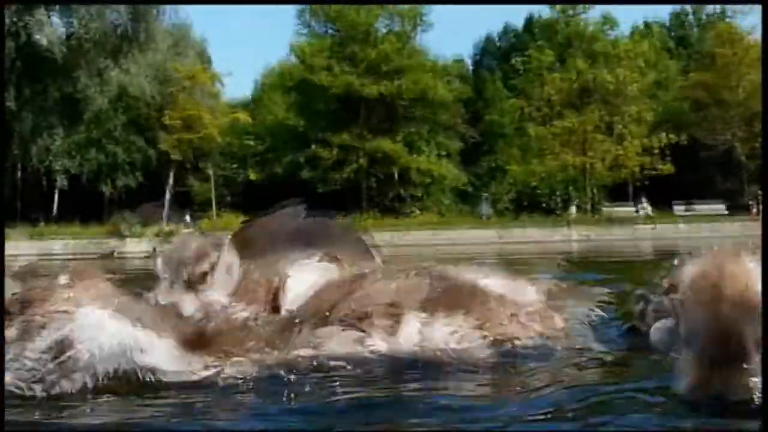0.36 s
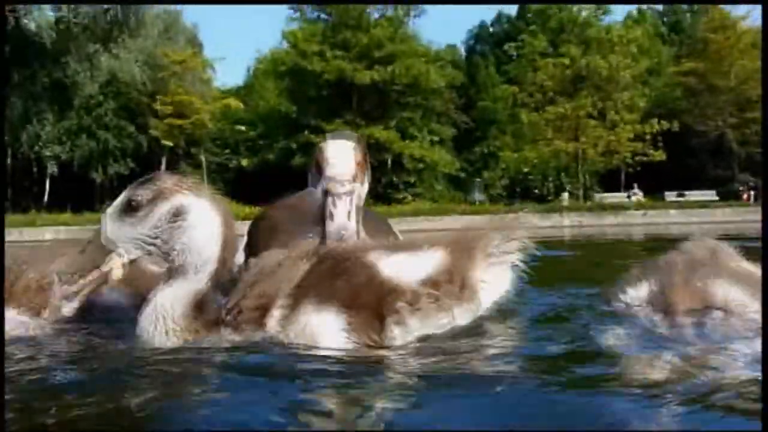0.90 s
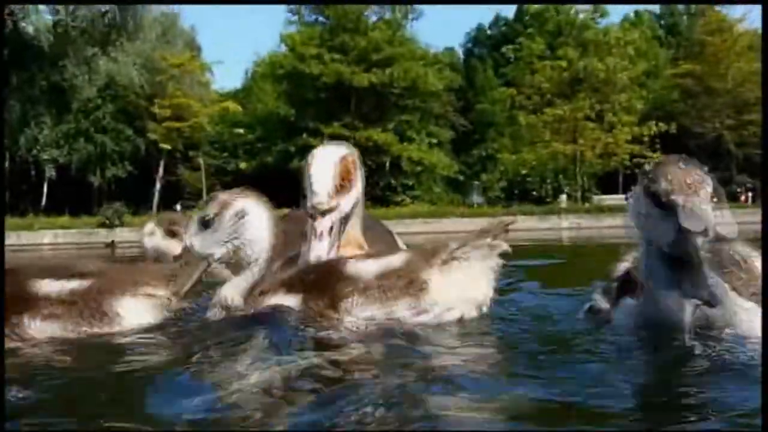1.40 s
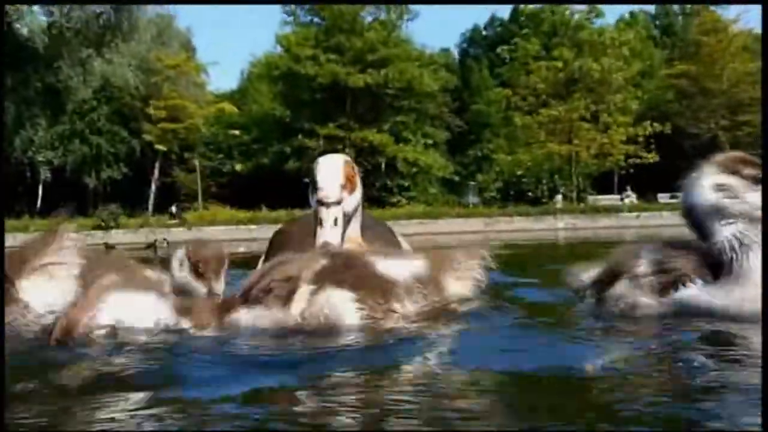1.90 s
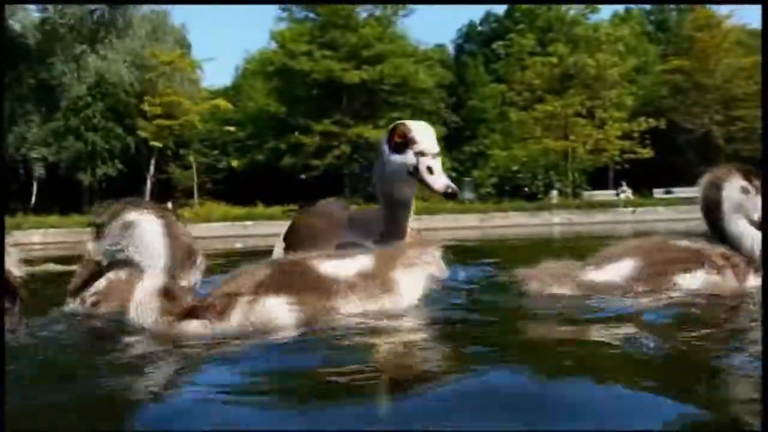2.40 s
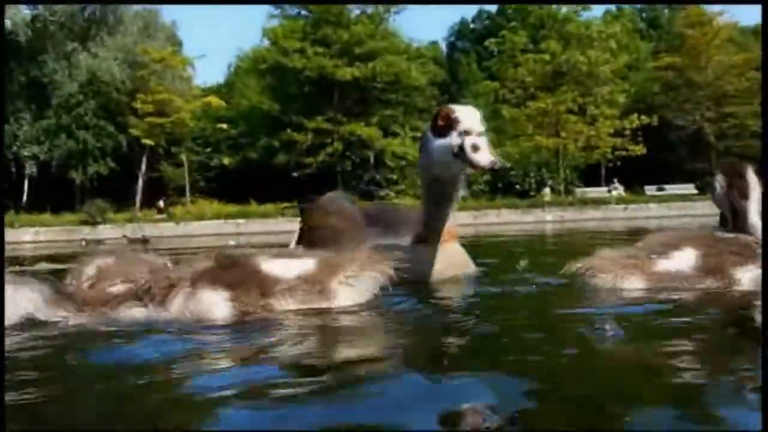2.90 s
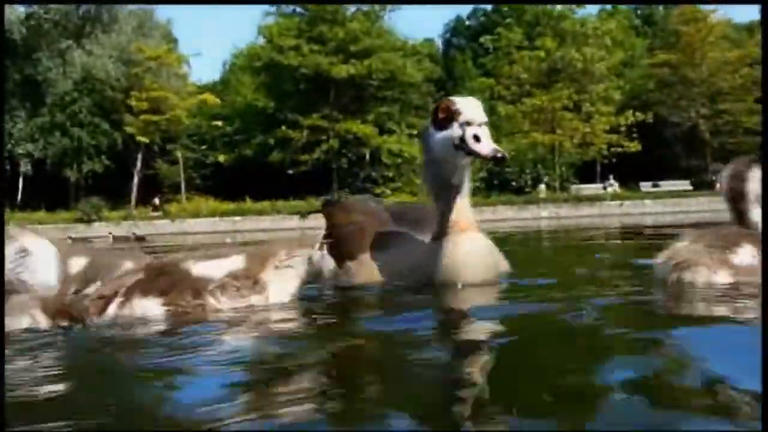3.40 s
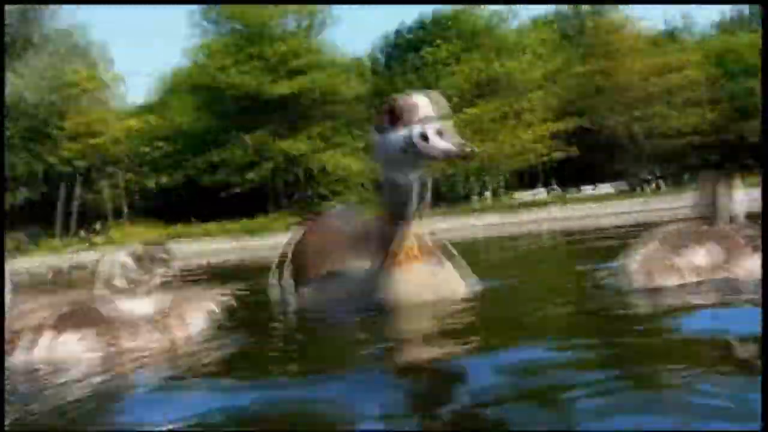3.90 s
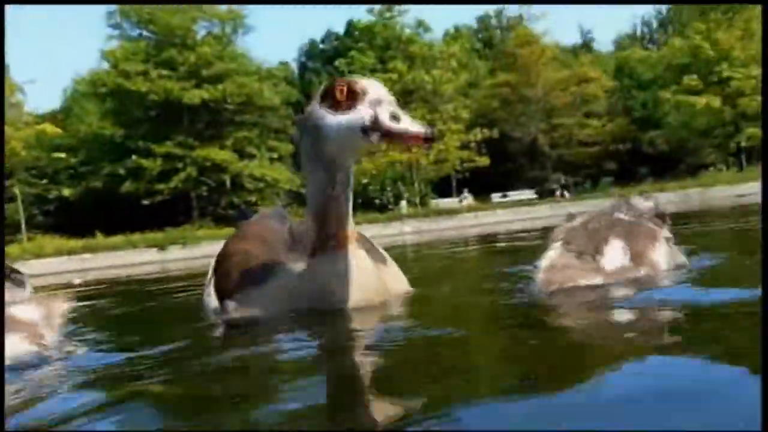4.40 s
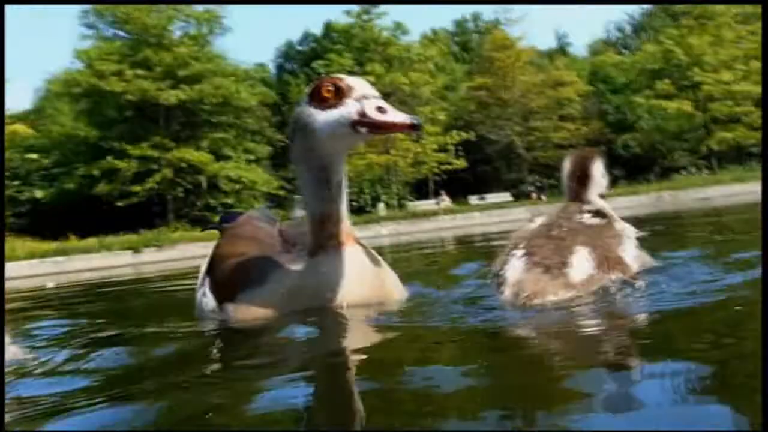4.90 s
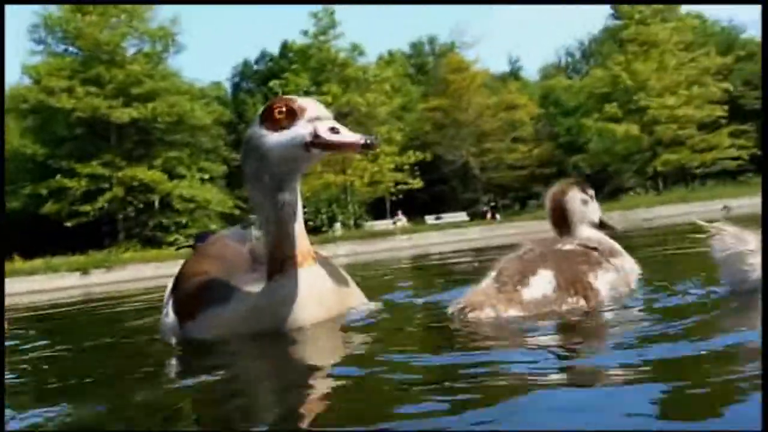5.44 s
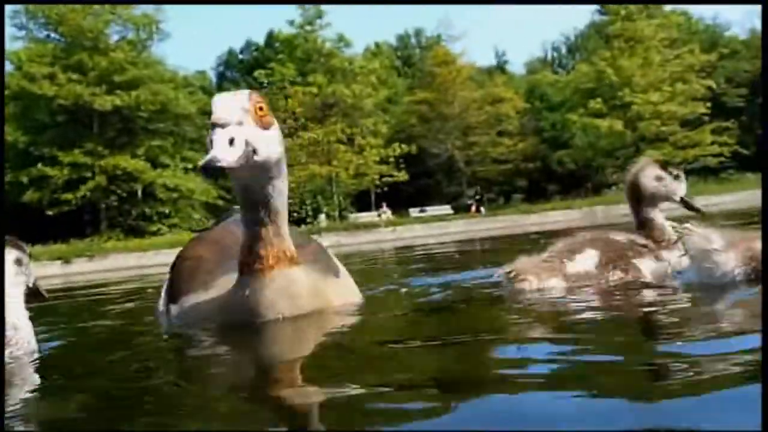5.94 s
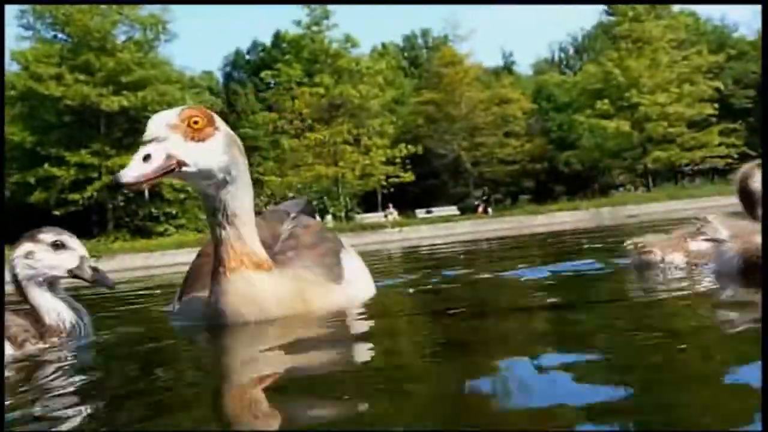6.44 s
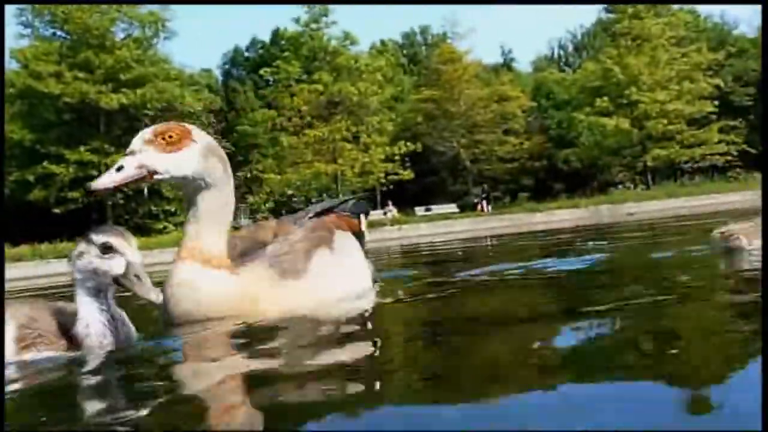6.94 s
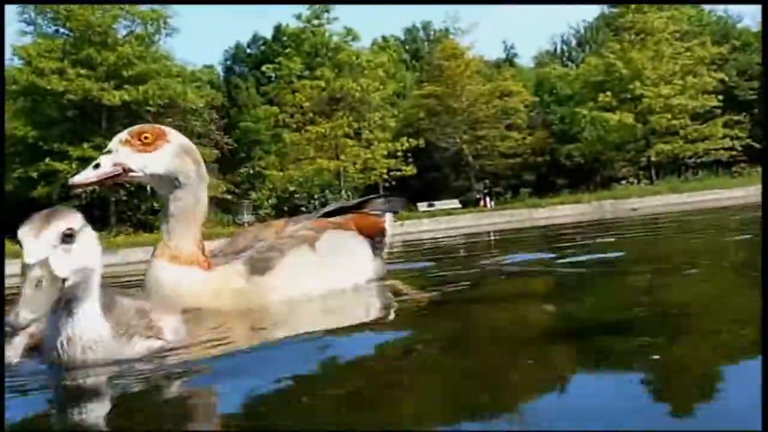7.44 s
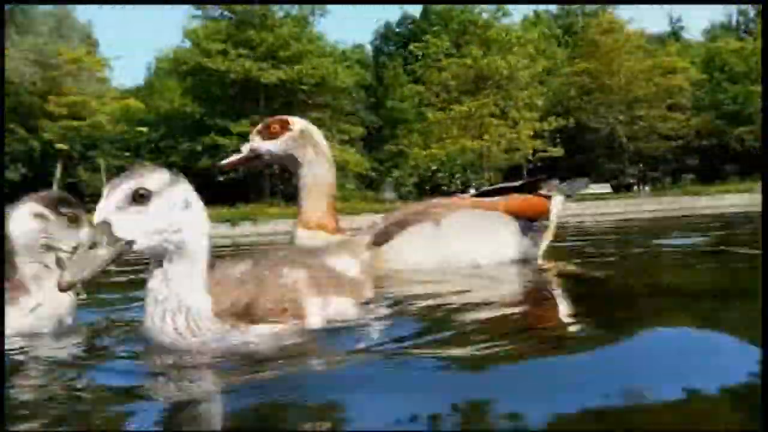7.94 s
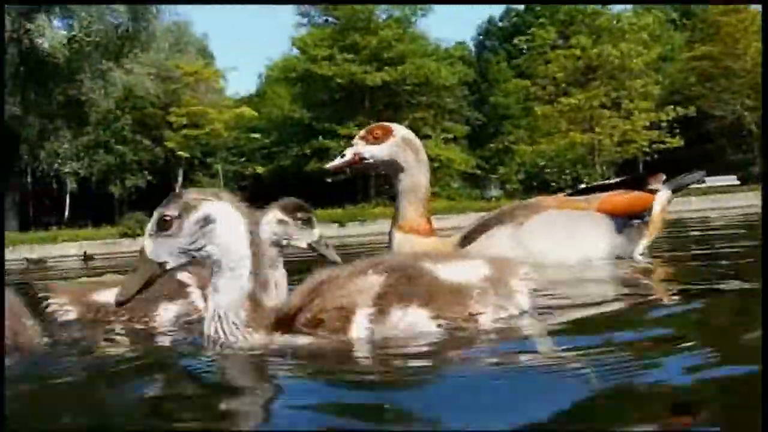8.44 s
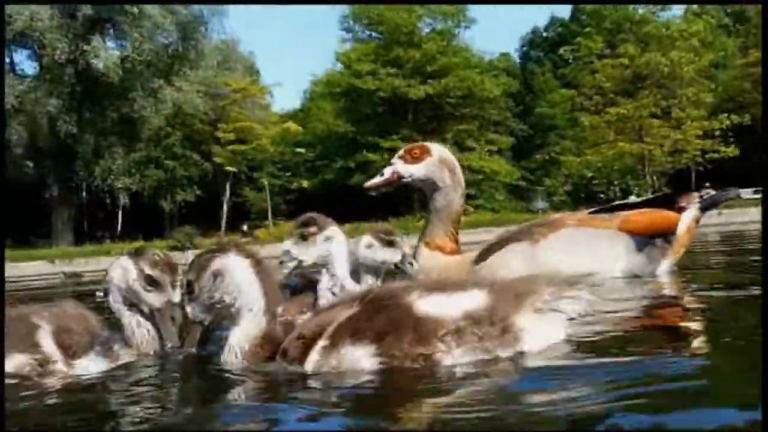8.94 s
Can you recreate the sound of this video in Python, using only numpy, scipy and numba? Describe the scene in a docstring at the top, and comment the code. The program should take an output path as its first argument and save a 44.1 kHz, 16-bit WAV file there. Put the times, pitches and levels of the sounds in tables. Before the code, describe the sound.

Goslings peep and whistle at the waterline of a park lake while their parent gives short breathy hisses; drips, knocks and farther screams surround them.

```python
"""Drips and dabbling beaks come first, close to a small microphone at the water line of a park lake.
Birds scream roughly further off (fluttering tones and noise); knocks ring the microphone's housing.
Goslings peep and whistle (near sines with moving pitch), and their parent gives short hoarse hisses,
mostly in pairs (chopped breath noise through throat resonances). Far traffic rumbles below, in noise bands;
a faint noise flickers at 8 to 10 kHz, over a thin steady whine."""
import sys
import numpy as np
from scipy import signal
from scipy.io import wavfile
from numba import njit

SR = 44100
rng = np.random.default_rng(int(sys.argv[2]) if len(sys.argv) > 2 else 0)


def dump_mix(stems):
    """Bounce the given channels to the path in sys.argv[1] as a 16-bit WAV at rate SR."""
    frames = np.atleast_2d(stems).T  # one column per channel
    limited = np.clip(frames, -1, 1)  # hard clip at full scale
    pcm = np.round(limited * 32767).astype(np.int16)
    wavfile.write(sys.argv[1], SR, pcm)


def field_ratio(decibels):
    """Amplitude ratio for a level in dB (20 dB per decade); scalars and array-likes work."""
    return 10 ** (np.asarray(decibels, dtype=float) / 20)


N = 400428


def rms_one(x):
    """Scale to rms 1."""
    return x / np.sqrt(np.mean(x ** 2) + 1e-20)


def band(x, low_hz, high_hz, order=2):
    """Butterworth band-pass."""
    return signal.sosfilt(signal.butter(order, [low_hz, high_hz], "band", fs=SR, output="sos"), x)


def drift(rate_hz, size):
    """Random wandering slower than about rate_hz, rms 1: noise through two equal one-pole low-passes."""
    r = np.exp(-2 * np.pi * rate_hz / SR)
    settling = 4000
    noise = rng.standard_normal(size + settling)
    return rms_one(signal.lfilter([1], [1, -2 * r, r * r], noise)[settling:])


def per_sample(rows):
    """First sample of a call, and its columns after the time drawn out sample by sample."""
    s, *columns = np.transpose(rows)
    start = round(s[0] * SR)
    t = np.arange(start, min(round(s[-1] * SR), N)) / SR
    return start, [np.interp(t, s, column) for column in columns]


def add(out, at, sound, fade_s):
    """Mix a sound in from sample at, with straight fades at both ends."""
    k = np.arange(len(sound))
    fade = np.clip(np.minimum(k, k[::-1]) / (fade_s * SR), 0, 1)
    out[at:at + len(sound)] += (sound * fade)[:N - at]


@njit
def resonate(x, hz, r, sr):
    """Two-pole resonance whose centre moves, gain 1 on top."""
    y = np.zeros(len(x))
    for i in range(2, len(x)):
        drive = (1 - r * r) / 2 * (x[i] - x[i - 2])
        y[i] = drive + 2 * r * np.cos(2 * np.pi * hz[i] / sr) * y[i - 1] - r * r * y[i - 2]
    return y


def peak(x, hz, width_hz):
    """The resonance applied twice, so that the valleys stay dark; width_hz is that of one pass."""
    hz = hz * np.ones(len(x))
    r = np.exp(-np.pi * width_hz / SR)
    return resonate(resonate(x, hz, r, SR), hz, r, SR)


# tone colour of the park: (frequency [Hz], relative density [dB per Hz])
PARK_COLOUR = [(15, -33), (25, -1), (144, 2.5), (423, -4.5), (501, -3), (636, -8), (1100, -12), (1830, -19),
               (2750, -19.5), (4130, -26.5), (6830, -27.5), (7700, -26.5), (10000, -62.5), (16900, -120)]
# the park's level between 60 and 600 Hz: (time [s], level [dB])
PARK_LEVEL = [(0.0, -55), (0.86, -51), (1.34, -55.5), (2.63, -55), (2.93, -55.5), (3.82, -55),
              (4.05, -54.5), (4.86, -56), (5.41, -56), (6.02, -59), (6.32, -55), (8.67, -55.5),
              (9.08, -53.5)]


def park():
    """Far rumble in third-octave noise bands, each wandering a little in level."""
    t = np.arange(N) / SR
    edges_hz = 22 * 2 ** (np.arange(27) / 3)
    white = rng.standard_normal((2, N))
    patches = [drift(3.2, N) for _ in range(4)]
    hz, db = np.transpose(PARK_COLOUR)
    rumble = 0
    for k, (low_hz, high_hz) in enumerate(zip(edges_hz, edges_hz[1:])):
        # the last two rows of the colour play no part
        level_db = np.interp(np.log(low_hz * high_hz) / 2, np.log(hz[:-2]), db[:-2])
        rumble = rumble + field_ratio(level_db + 1.69 * patches[k % 4]) * band(white[k % 2], low_hz, high_hz)
    steep_top = signal.cheby2(12, 30, 8050, fs=SR, output="sos")   # the bands end steeply at 8 kHz
    rumble = signal.sosfilt(steep_top, band(rumble, 43, 12000))
    rumble = rumble / np.std(band(rumble, 60, 600))
    return field_ratio(np.interp(t, *np.transpose(PARK_LEVEL))) * rumble


# level of the faint noise at 8 to 10 kHz, before its flicker: (time [s], level [dB])
TOP_NOISE_LEVEL = [(0, -81), (1.5, -85), (2.4, -83), (2.7, -73.5), (3.05, -71.5), (3.1, -82.5), (4.0, -84),
                   (4.5, -78), (5.0, -86.5), (5.55, -78), (6.13, -72), (6.4, -82.5), (6.7, -75),
                   (6.8, -86.5), (8.6, -83.5), (8.8, -76), (9.08, -72.5)]
# where this noise is left out: (start [s], end [s])
TOP_NOISE_GAP = (5.71, 6.125)


def top_noise():
    """A band of noise at 8 to 10 kHz whose level flickers at random; it is left out for a moment."""
    t = np.arange(N) / SR
    flicker = field_ratio(2.2 * drift(40, N))
    noise = rms_one(band(rng.standard_normal(N), 7750, 10250, order=8)) * flicker
    present = (t < TOP_NOISE_GAP[0]) | (t > TOP_NOISE_GAP[1])
    return field_ratio(np.interp(t, *np.transpose(TOP_NOISE_LEVEL))) * noise * present


def whine():
    """A thin steady tone of the electronics, its phase wandering slightly."""
    t = np.arange(N) / SR
    return field_ratio(-83.5) * np.sin(2 * np.pi * 6640 * t + 1.3 * drift(10, N))


# echoes off the banks: (delay [s], level [dB])
BANK_ECHOES = [(.04, -34), (.17, -37), (.24, -41.5), (0.361, -50.5)]


def shore(x):
    """A few dull echoes off the banks, each smeared by the trees."""
    size = round(.05 * SR)
    smear = rng.standard_normal(size) * np.hanning(size)
    dull = signal.fftconvolve(band(x, 400, 2500), smear / np.linalg.norm(smear))[:N]
    out = np.zeros(N)
    for delay_s, db in BANK_ECHOES:
        delay = round(delay_s * SR)
        out[delay:] += field_ratio(db) * dull[:N - delay]
    return out


# soft low grunts: (time [s], length [s], pitch [Hz], level [dB])
GRUNT_CALLS = [(0.551, 0.083, 560, -57), (0.664, 0.043, 560, -48), (3.786, 0.026, 555, -57.5),
               (3.951, 0.069, 550, -54.5), (4.071, 0.034, 506, -47.5), (4.086, 0.15, 960, -59),
               (7.606, 0.42, 1105, -67.5), (8.25, 0.23, 1107, -65.5)]


def grunts():
    """Soft grunts: breath noise through one narrow resonance."""
    out = np.zeros(N)
    for s, length_s, hz, level_db in GRUNT_CALLS:
        breath = rng.standard_normal(round(length_s * SR))
        add(out, round(s * SR), field_ratio(level_db) * rms_one(peak(breath, hz, 82)), .004)
    return out


# rough screams further off, one curve each: (time [s], pitch [Hz], level of the lowest tone [dB])
SCREAM_CURVES = [
    [(.07, 990, -51), (.1, 1114, -53.5), (.17, 1168, -58)],
    [(.38, 1450, -53), (.45, 1560, -56.5), (.6, 1690, -62)],
    [(.95, 1450, -56), (1.05, 1572, -55.5), (1.15, 1580, -53)],
    [(2.655, 1602, -64), (2.78, 1560, -62), (2.9, 1536, -57), (3.05, 1347, -58), (3.08, 1260, -65)],
    [(3.69, 1500, -68), (3.84, 1582, -57), (3.96, 1570, -59.5)],
    [(5.45, 1400, -82), (5.6, 1860, -72), (5.71, 1805, -61)],
    [(6.125, 1594, -51), (6.22, 1500, -58), (6.3, 1500, -59.5), (6.41, 1494, -56), (6.5, 1374, -56.5),
     (6.57, 1306, -60)],
    [(8.78, 1610, -72.5), (8.84, 1548, -58.5), (8.94, 1493, -53), (9.0, 1500, -54), (9.16, 1244, -55)],
]
# for each scream: (second harmonic [dB], third harmonic [dB], rasp [dB], swell of these, start to end [dB])
SCREAM_COLOURS = [(-77, -84, -67, -12), (-76, -91, -64.5, -18), (-77, -92, -85, 7), (-59.5, -79, -58, 2),
                  (-81, -83, -72.5, 5), (-73, -82, -69, 5), (-59, -79, -58, -3), (-66, -70, -59, 5)]


def screams():
    """Fluttering harmonics, half tone and half noise, smeared more higher up; breath rasps in the beak."""
    rasp_hz, rasp_width_hz = 2150, 950   # the beak's broad resonance; a second rides on the second harmonic
    release_s = .025   # harmonics above the lowest, and the rasp, die away first
    out = np.zeros(N)
    for rows, (second_db, third_db, rasp_db, swell_db) in zip(SCREAM_CURVES, SCREAM_COLOURS):
        at, (hz, level_db) = per_sample(rows)
        size = len(hz)
        before_end_s = (at + np.arange(size)) / SR - rows[-1][0]
        upper_db = swell_db * np.linspace(-.5, .5, size) - 14 * np.exp(before_end_s / release_s)
        hz = hz * (1 + .018 * drift(50, size))
        phase = 2 * np.pi * np.cumsum(hz * (1 + 0.0304 * drift(285, size))) / SR
        breath = rng.standard_normal(size) * field_ratio(1.0 * drift(50, size))
        rasp = peak(breath, 2 * hz, rasp_width_hz) + peak(breath, rasp_hz, rasp_width_hz)
        voice = field_ratio(rasp_db + upper_db) * rms_one(band(rasp, 1400, 4160, order=3))
        for k, db in enumerate([level_db, second_db + upper_db, third_db + upper_db], 1):
            tone = field_ratio(2.6 * drift(60, size)) * np.sin(k * phase)
            noise = rms_one(peak(breath, k * hz, 260 * k))
            voice = voice + field_ratio(db) * (tone + .62 * noise)
        add(out, at, voice, .008)
    return out


# knocks on the housing, before the band-pass: (time [s], level [dB], gain of modes above 1 kHz [dB])
BUMP_HITS = [(0.744, -31.5, -4), (0.77, -24, -14), (0.852, -21.5, 11), (0.87, -30, -3), (0.893, -24, 4),
             (0.916, -30, 4.5), (0.928, -32, -2)]
# the housing's modes: (frequency [Hz], level [dB], time to fall 60 dB [s])
HOUSING_MODES = [(308, -7.5, 0.052), (446, 0.5, 0.015), (1500, -1.5, 0.0065), (3000, -15, 0.013),
                 (5460, -24, 0.0023)]


def bumps():
    """Something bumps the housing and sets its modes ringing; each knock has its own amount of crack."""
    out = np.zeros(N)
    t = np.arange(round(.08 * SR)) / SR
    for s, level_db, crack_db in BUMP_HITS:
        ring = sum(field_ratio(db + crack_db * (hz > 1000) - 60 * t / t60_s) * np.sin(2 * np.pi * hz * t)
                   for hz, db, t60_s in HOUSING_MODES)
        add(out, round(s * SR), -field_ratio(level_db) * ring, .0002)
    return band(out, 230, 8000, order=3)


# drips and dabbles near the microphone, before the band-pass:
# (time [s], bubble level [dB], bubble pitch at its start [Hz], tick strength [dB])
DRIP_HITS = [(.0285, -36.5, 2020, -7), (.099, -36.5, 880, 1.5), (.1344, -44, 1070, 2.5),
             (.1938, -40.5, 1410, 1.5), (.2885, -41.5, 829, 3.5), (.353, -35.5, 1640, -8),
             (.394, -29, 1100, 1), (.4257, -30.5, 1500, -7), (.534, -33.5, 1710, -7.5),
             (.5554, -41, 1670, -3), (.6, -38.5, 1420, -9), (.6759, -40.5, 1380, -12),
             (.719, -36, 1660, -7), (.7252, -30, 1000, 3.5), (1.3465, -28.5, 1850, -13),
             (1.4485, -30.5, 1500, -10), (1.462, -32.5, 1320, -4), (1.6924, -39, 1640, -4),
             (1.7398, -40, 1700, -10), (1.8578, -40.5, 840, 3), (1.8994, -43, 1140, 1),
             (2.038, -45, 1040, -6), (2.126, -40, 1930, -4), (2.164, -31.5, 1730, -5),
             (2.1744, -37.5, 1350, 2), (2.2144, -43, 1070, 2), (2.4342, -31, 1200, -7.5),
             (2.6254, -43, 1790, 0), (2.8524, -31.5, 1030, 0.5), (2.9108, -36.5, 1530, 1),
             (2.9344, -31.5, 1180, -3), (3.2603, -36.5, 3040, -11), (3.6885, -41, 1410, -5),
             (3.877, -48, 1540, 5.5), (5.362, -42, 1200, -1), (5.5455, -37, 1200, 1.5),
             (5.8985, -32.5, 1160, -18), (6.335, -38, 1033, -11), (6.4183, -34.5, 756, 0.5),
             (6.583, -38, 1230, -5), (7.3544, -41, 2260, -8), (7.388, -45, 1210, 6.5),
             (8.0017, -46, 2720, -6), (8.923, -45, 1540, -7)]


def water():
    """A drip is a noise tick and a bubble ringing upward; fainter ones come at random, thickest early on."""
    out = np.zeros(N)
    t = np.arange(round(.04 * SR)) / SR
    faint = [(s ** 2.5 * N / SR, -58 + 9 * a, 700 * 4.5 ** b, -3) for s, a, b in rng.random((150, 3))]
    for s, level_db, hz, tick_db in list(DRIP_HITS) + faint:
        # cycles to fall 60 dB: the sharper the tick, the shorter the ring
        ring_cycles = max(12.1 - 0.85 * tick_db, 3)
        bubble = np.sin(2 * np.pi * hz * t * (1 + 12 * t)) * field_ratio(-60 * t * hz / ring_cycles)
        burst = rng.standard_normal(len(t)) * field_ratio(-60 * t / 0.013)
        tick_top_hz = min(1.67 * hz, 3700) + 300 * max(tick_db, 0)
        tick = band(burst, 0.7 * hz, tick_top_hz, order=3)
        add(out, round(s * SR), field_ratio(level_db) * (bubble + field_ratio(tick_db + 6) * tick), .0008)
    return band(out, 300, 4300, order=4)   # water gives little above 4 kHz


def whistle(hz, waver_db):
    """A near sine with a slight waver of pitch and level, rms near 1."""
    phase = 2 * np.pi * np.cumsum(hz * (1 + .009 * drift(70, len(hz)))) / SR
    return np.sqrt(2) * field_ratio(waver_db * drift(34, len(hz))) * np.sin(phase)


# farther goslings peep at random: (start [s], end [s], level before the thinning [dB])
CHATTER_SPELLS = [(0.145, .75, -77), (5.3, 5.7, -75), (6.201, 6.561, -66.5), (8.117, 8.55, -75.5)]
# range of the random foot of a farther peep: (lowest [Hz], highest [Hz])
CHATTER_FEET = (1900, 3000)
# range of its random rise: (smallest [Hz], largest [Hz])
CHATTER_RISES = (50, 500)


def chatter():
    """Rows for random peeps of the farther goslings, 40 a second within each spell."""
    rows = []
    for s, end_s, level_db in CHATTER_SPELLS:
        for a, b, c, d in rng.random((round(40 * (end_s - s)), 4)):
            at_s = s + a * (end_s - s - .05)
            length_s = 0.0346 + 0.0304 * d
            foot_hz = np.interp(b, [0, 1], CHATTER_FEET)
            top_hz = foot_hz + np.interp(c, [0, 1], CHATTER_RISES)
            rows.append((at_s, length_s, foot_hz, top_hz, level_db))
    return rows


# arched peeps: (time [s], length [s], foot [Hz], top [Hz], level at the top before the thinning [dB])
PEEP_CALLS = [ (1.807, .065, 3260, 4030, -70), (1.896, .048, 3210, 4150, -67),
              (1.975, .048, 3330, 4430, -66), (2.039, 0.043, 3480, 4700, -63),
              (2.501, 0.068, 2870, 3350, -68), (2.596, 0.055, 3030, 3900, -64),
              (2.654, 0.048, 3300, 3880, -62), (2.763, 0.055, 3300, 4000, -67),
              (2.939, 0.057, 3000, 3600, -61), (2.985, 0.04, 3080, 3900, -60),
              (3.08, 0.064, 3110, 4640, -62.5), (3.145, .045, 3250, 4700, -63),
              (3.222, 0.051, 2540, 5000, -59.5), (4.285, 0.057, 2500, 3470, -62),
              (4.353, 0.058, 2480, 3500, -62.5), (4.431, 0.046, 2350, 3750, -61),
              (4.52, 0.045, 2400, 3980, -61.5), (5.215, .054, 2860, 3170, -73),
              (5.267, 0.035, 3000, 3900, -65.5), (5.341, 0.076, 2950, 4080, -67.5),
              (5.414, 0.052, 3000, 4200, -67), (5.49, .064, 3000, 4370, -63.5),
              (5.923, .051, 2620, 3000, -74), (5.985, 0.048, 2610, 3450, -67),
              (6.054, 0.068, 2800, 3750, -68), (6.135, 0.036, 3300, 3900, -61),
              (6.23, 0.051, 3300, 3880, -61), (6.355, .048, 2770, 3420, -65), (6.422, .04, 2900, 3450, -59),
              (6.459, 0.055, 2940, 4150, -61), (6.566, 0.044, 3100, 4660, -59.5),
              (6.633, 0.059, 3320, 4800, -63), (6.721, 0.046, 3000, 5060, -55.5),
              (7.746, 0.043, 2300, 2600, -58.5), (7.808, .058, 2210, 3350, -58),
              (7.842, 0.055, 3250, 3700, -72), (7.883, 0.057, 2360, 3820, -59.5),
              (7.963, 0.048, 2350, 3830, -60), (8.054, 0.053, 2430, 3830, -60.5)]
# peeps thin out above these pitches: (pitch [Hz], loss [dB per kHz])
PEEP_THINNING = [(3100, 12.0), (4100, 35.0)]


def peeps():
    """Short whistles whose pitch rises and falls in an arch, fainter at the top and at high pitch."""
    top_dip_db = 5.0
    out = np.zeros(N)
    for s, length_s, foot_hz, top_hz, level_db in list(PEEP_CALLS) + chatter():
        arch = np.abs(np.sin(np.linspace(0, np.pi, round(length_s * SR))))
        hz = foot_hz + (top_hz - foot_hz) * arch ** 1.7
        thinning_db = sum(loss * np.maximum(hz - above_hz, 0) / 1000 for above_hz, loss in PEEP_THINNING)
        fainter_db = thinning_db + top_dip_db * arch ** 4
        add(out, round(s * SR), field_ratio(level_db + top_dip_db - fainter_db) * whistle(hz, waver_db=1.2), .006)
    return out


# straight glides: (time [s], length [s], start [Hz], end [Hz], level at mid pitch [dB])
GLIDE_CALLS = [(.19, 0.13, 3360, 3320, -76), (.44, 0.06, 3170, 3200, -79), (0.527, .03, 1494, 2540, -55),
               (0.543, .2, 2620, 3030, -72), (0.575, 0.038, 2210, 1680, -59),
               (0.942, 0.24, 2880, 3110, -72), (1.352, .04, 2160, 2510, -70), (1.55, 0.1, 2590, 2870, -77),
               (1.707, 0.068, 1780, 1640, -64), (1.941, .02, 2600, 2320, -62),
               (1.975, .13, 2600, 2320, -73), (2.098, 0.024, 1120, 2410, -56.5),
               (2.198, .08, 1990, 2560, -65), (2.621, .04, 2500, 1610, -61), (2.682, 0.11, 2550, 2080, -63),
               (3.09, .15, 2240, 2130, -63.5), (3.977, .07, 2600, 2740, -70), (4.06, .12, 3240, 3510, -72),
               (4.12, 0.047, 2700, 1670, -65), (5.153, .05, 2090, 2090, -68),
               (5.507, 0.21, 3550, 3630, -63.5), (6.296, 0.032, 2265, 1210, -56),
               (7.722, 0.095, 1710, 1390, -66), (8.454, 0.036, 2880, 2580, -67),
               (8.687, 0.082, 1990, 2050, -66)]
# whistles that hold, then drop ever faster: (time [s], held [s], held [Hz], last [Hz], level while held [dB])
DROP_CALLS = [(1.661, 0.028, 3420, 1590, -80), (3.498, .42, 3180, 1260, -75), (5.03, .1, 3330, 1530, -78.5),
              (7.52, .07, 3560, 1440, -85)]
# the climbing whistle: (time from its start [s], pitch [Hz], level [dB])
CLIMB_SHAPE = [(0, 1806, -14), (.013, 2910, -6.5), (.044, 2850, 0), (.053, 2400, 0), (.102, 2540, -1.5),
               (.129, 3000, -3), (.21, 3350, -9.5), (.284, 3470, -0.5), (.32, 3430, -5)]
# where it is sung: (time [s], factor on its pitch, gain on its level [dB])
CLIMB_CALLS = [(2.365, 1.04, -59), (5.83, 1.0, -57.5)]
# the stepped whistle: (time [s], pitch [Hz], level [dB])
STEPPED_CALL = [(8.53, 2630, -59), (8.576, 2910, -71), (8.596, 3520, -69), (8.724, 3530, -60),
                (8.78, 3480, -57)]


def whistles():
    """Longer gosling whistles glide, drop, climb or step; glides and drops grow louder as they go down."""
    drop_s, drop_bend, low_gain_db_per_khz = .09, 1.6, 13.5
    out = np.zeros(N)

    def sing(at, hz, level_db):
        add(out, at, field_ratio(level_db) * whistle(hz, waver_db=2.5), .008)

    for s, length_s, start_hz, end_hz, level_db in GLIDE_CALLS:
        hz = np.linspace(start_hz, end_hz, round(length_s * SR))
        sing(round(s * SR), hz, level_db - low_gain_db_per_khz * (hz - hz.mean()) / 1000)
    for s, held_s, held_hz, last_hz, level_db in DROP_CALLS:
        t = np.arange(round((held_s + drop_s) * SR)) / SR
        hz = held_hz + (last_hz - held_hz) * np.clip((t - held_s) / drop_s, 0, 1) ** drop_bend
        sing(round(s * SR), hz, level_db - low_gain_db_per_khz * (hz - held_hz) / 1000)
    at, (hz, shape_db) = per_sample(CLIMB_SHAPE)
    for s, factor, level_db in CLIMB_CALLS:
        sing(round(s * SR) + at, factor * hz, level_db + shape_db)
    at, (hz, level_db) = per_sample(STEPPED_CALL)
    sing(at, hz, level_db)
    return out


def throat(breath, modes, shift, high_shift, top_db):
    """Parallel throat resonances of alternating sign, rms 1; high_shift moves those from 5 kHz up."""
    total = 0
    for k, (hz, width_hz, db) in enumerate(modes):
        centre_hz = hz * (shift if hz < 5000 else high_shift)
        gain = field_ratio(db + top_db * (hz > 8000)) * (-1) ** k
        total = total + gain * rms_one(peak(breath, centre_hz, width_hz))
    return rms_one(total)


# hoarse calls at the microphone:
# (start of the hold [s], held [s], level of the low part [dB], swell over the hold [dB], first resonance [Hz])
HISS_CALLS = [(.78, 0.1, -32, 4.5, 1184), (1.174, 0.088, -28, -1.5, 1170), (4.198, 0.093, -28.5, 0, 1200),
              (4.59, 0.096, -27.5, 0, 1140), (6.616, 0.093, -38.5, -4, 806)]
# for each call: (factor on the low and middle resonances, on the upper ones below 5 kHz, on those from 5 kHz,
# middle part at its strongest [dB], upper part at the start [dB], gain of resonances over 8 kHz [dB])
THROAT_POSTURES = [(1.01, 0.994, 0.99, -12.5, -17.5, 5.5), (1.02, 0.995, 1.0, -19, -17, 2),
                   (0.986, 1.4, 0.85, -12, -40.5, -15), (.99, 1.7, 0.88, -18, -52, -13),
                   (0.873, 1.075, 0.95, -12, -20, -4)]
# resonances of the low, middle and upper part, before the factors:
# (frequency [Hz], width of one pass [Hz], level [dB])
LOW_MODES = [(756, 197, -9), (1680, 110, -14.5)]
MIDDLE_MODES = [(2407, 320, 13), (2870, 200, 7), (3300, 140, -3.5), (3750, 990, -6)]
UPPER_MODES = [(3910, 150, -3.5), (4286, 320, 7), (6800, 250, 8.5), (7280, 110, 0), (8420, 1300, -9),
               (9900, 330, -1)]


def hisses():
    """The adult's breath noise, chopped by loosely flapping membranes, through the throat."""
    attack_s, release_s, range_db = .022, 0.05, 31   # rise and fall span this range
    sag, spread, upper_fade_db = .12, 0.023, 3.5   # changes of the throat reached by the end of the hold
    middle_best, middle_fade_db = 0.33, 23   # share of the hold where strongest; fade by squared distance
    out = np.zeros(N)
    for call, posture in zip(HISS_CALLS, THROAT_POSTURES):
        s, held_s, start_db, swell_db, first_hz = call
        shift, upper_shift, high_shift, middle_db, upper_db, top_db = posture
        t = np.arange(-round(attack_s * SR), round((held_s + release_s) * SR)) / SR
        u = np.clip(t / held_s, 0, 1)   # share of the hold gone by
        rise = np.clip(-t / attack_s, 0, 1) ** 1.34
        fall = np.clip((t - held_s) / release_s, 0, 1) ** 1.33
        level_db = start_db + swell_db * u - range_db * (rise + fall)
        breath = rng.standard_normal(len(t)) * field_ratio(2.0 * drift(87, len(t)))

        # the first resonance sags; the upper ones below 5 kHz climb while those above sink
        closing = high_shift * (1 - spread * u)
        opening = upper_shift * (1 + spread * u)
        first = rms_one(peak(breath, first_hz * (1 - sag * u ** 2), 385))
        low = first + field_ratio(-12.0) * throat(breath, LOW_MODES, shift, closing, top_db)
        low = rms_one(band(low, 383, 1850 * shift, order=4))
        middle = throat(breath, MIDDLE_MODES, shift, closing, top_db)
        middle = rms_one(band(middle, 2200 * shift, 4300 * shift, order=4))
        upper = throat(breath, UPPER_MODES, opening, closing, top_db)
        upper = rms_one(band(upper, 2800, 9400, order=4))
        middle_gain = field_ratio(middle_db - middle_fade_db * (t / held_s - middle_best) ** 2)
        upper_gain = field_ratio(upper_db - upper_fade_db * u)
        voice = low + middle_gain * middle + upper_gain * upper
        add(out, round((s + t[0]) * SR), field_ratio(level_db) * voice, .003)
    return out


def scene():
    """Birds with their echoes, water, bumps, the whine, the flickering top noise and the park behind."""
    birds = hisses() + peeps() + whistles() + screams() + grunts()
    return (birds + shore(birds) + water() + bumps() + whine() + top_noise() + park())[None]


def top_cut(x):
    """Nothing passes above the cut-off."""
    return signal.sosfilt(signal.butter(12, 10790, fs=SR, output="sos"), x)


def record(dry):
    """The small microphone's signal: the top is cut steeply at 10.6 kHz and a trace of noise is added."""
    steep_cut = signal.cheby2(14, 45, 10600, fs=SR, output="sos")
    cut = signal.sosfilt(steep_cut, dry)
    noise = field_ratio(-91.0) * rng.standard_normal(dry.shape)
    return top_cut(cut + noise)


dry = scene()
out = record(dry)
dump_mix(out)
```